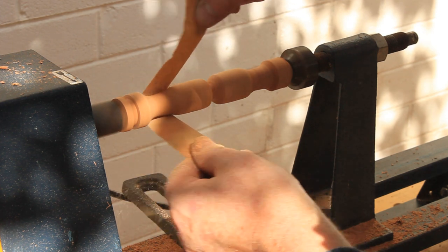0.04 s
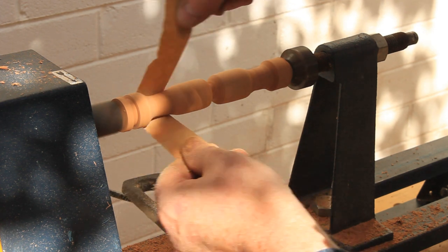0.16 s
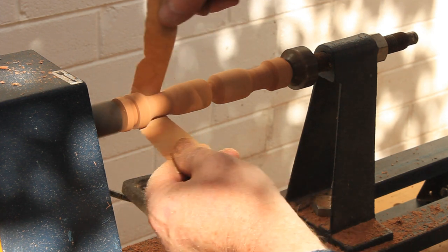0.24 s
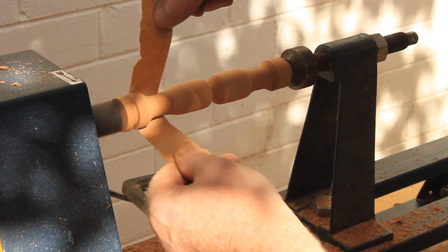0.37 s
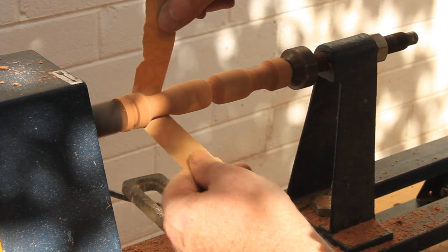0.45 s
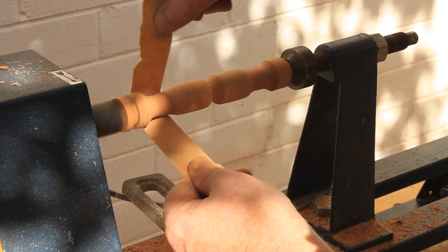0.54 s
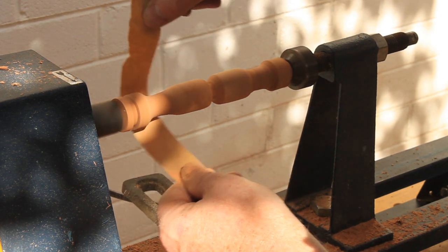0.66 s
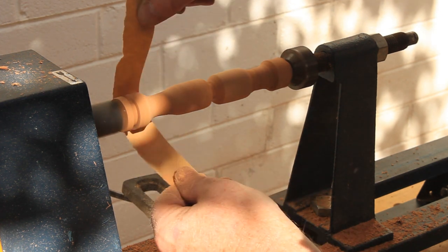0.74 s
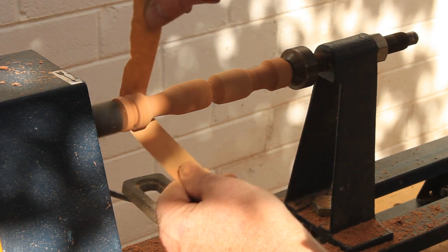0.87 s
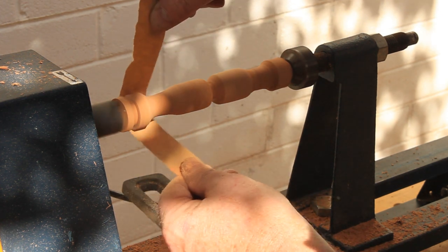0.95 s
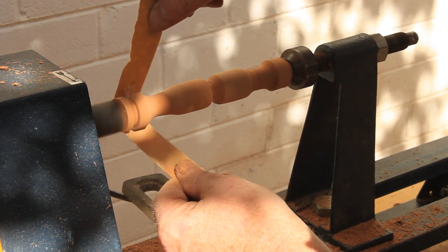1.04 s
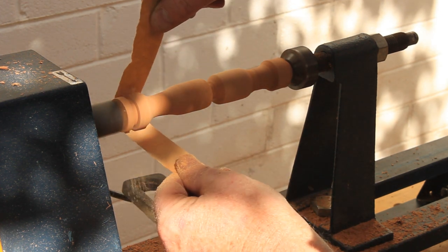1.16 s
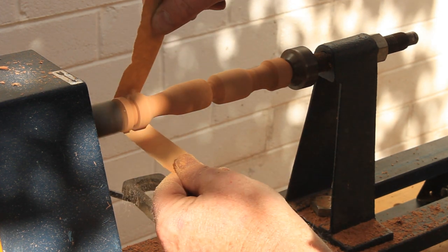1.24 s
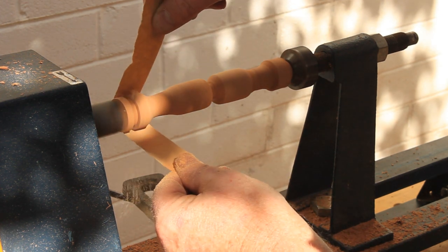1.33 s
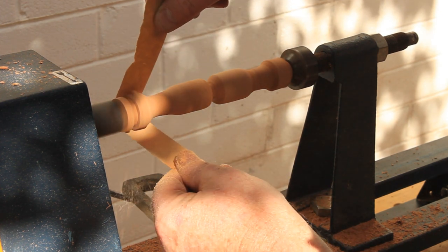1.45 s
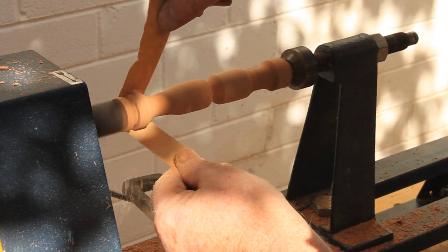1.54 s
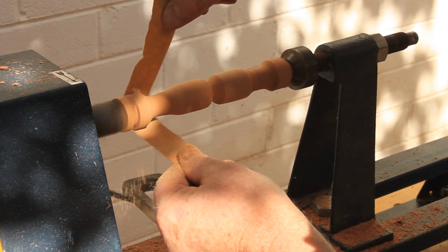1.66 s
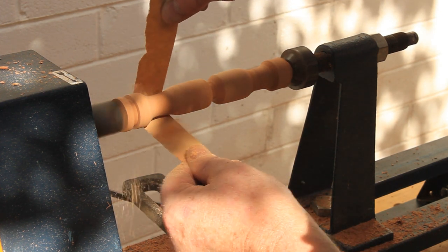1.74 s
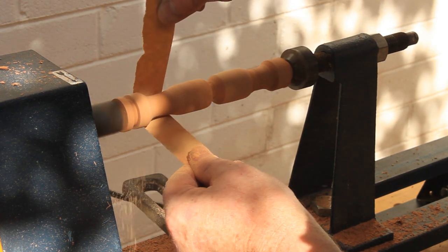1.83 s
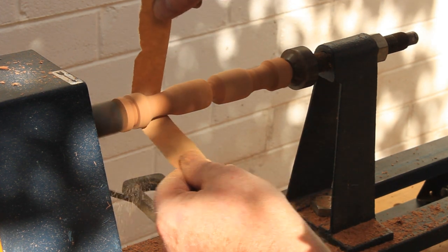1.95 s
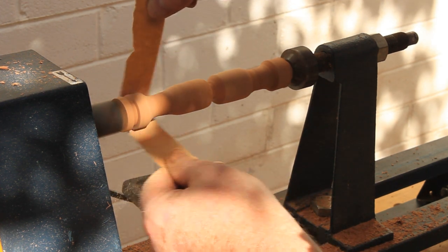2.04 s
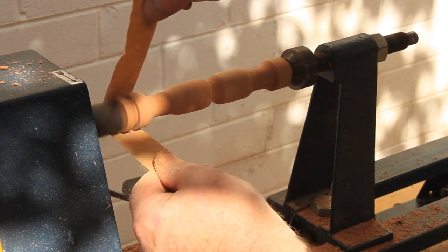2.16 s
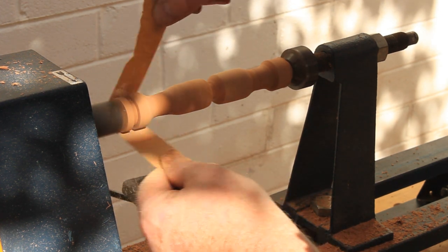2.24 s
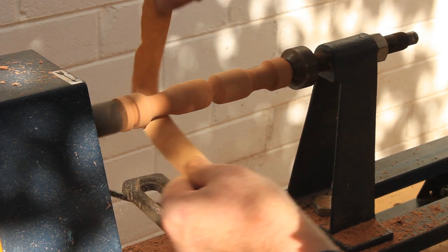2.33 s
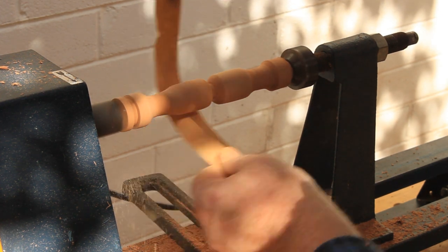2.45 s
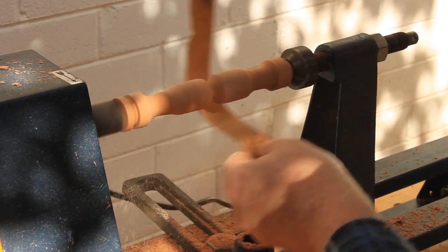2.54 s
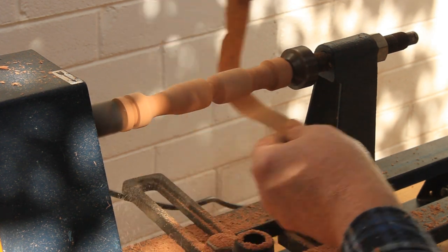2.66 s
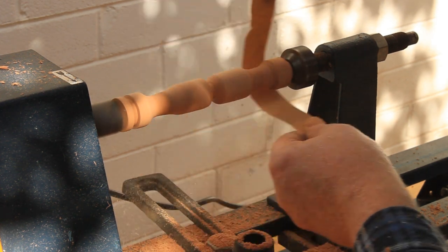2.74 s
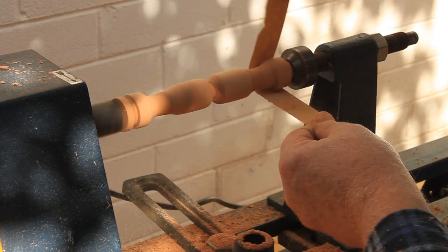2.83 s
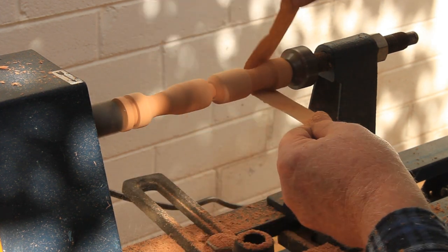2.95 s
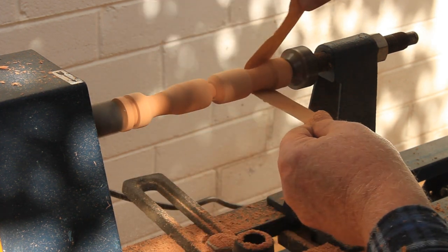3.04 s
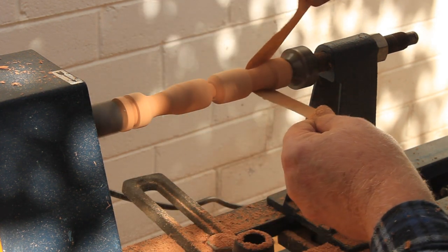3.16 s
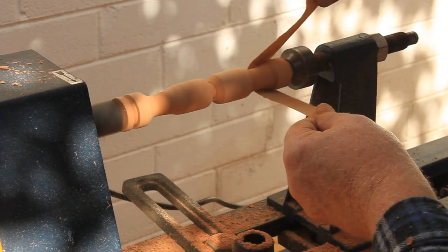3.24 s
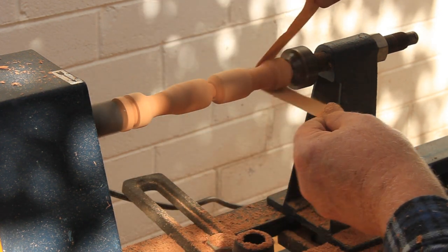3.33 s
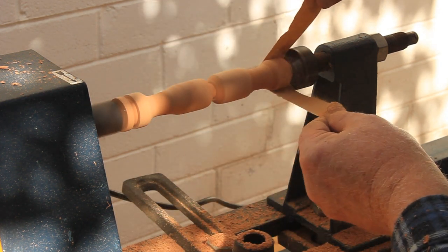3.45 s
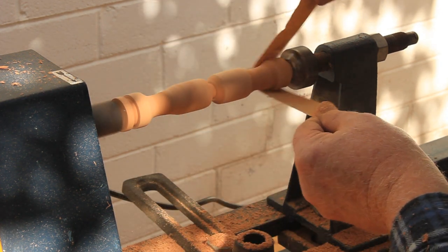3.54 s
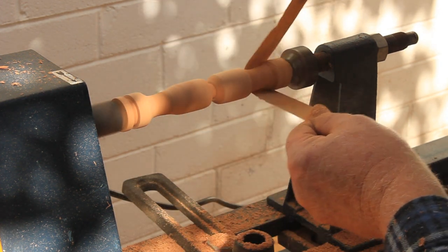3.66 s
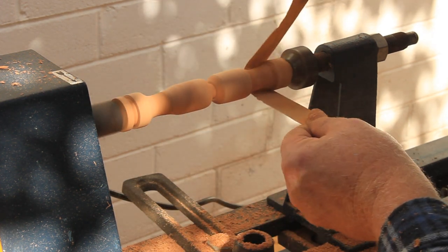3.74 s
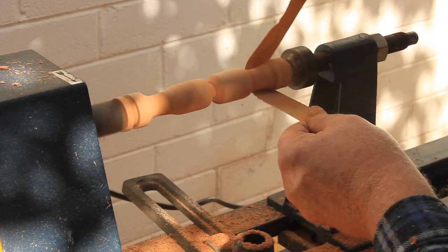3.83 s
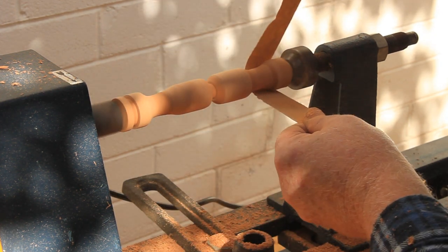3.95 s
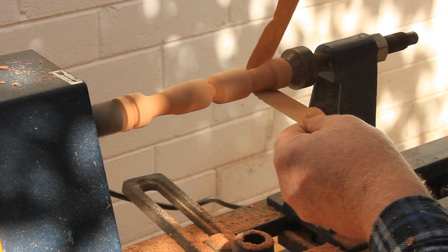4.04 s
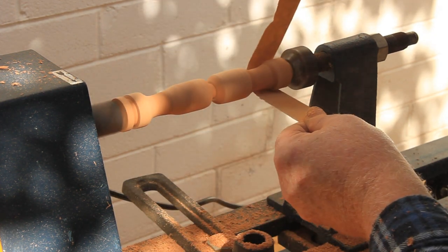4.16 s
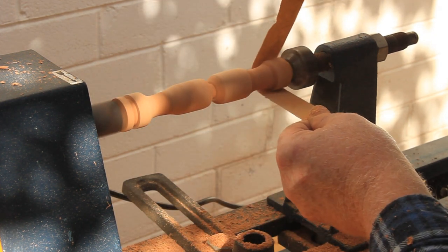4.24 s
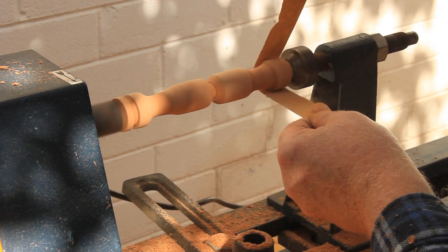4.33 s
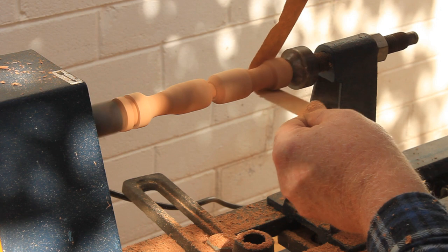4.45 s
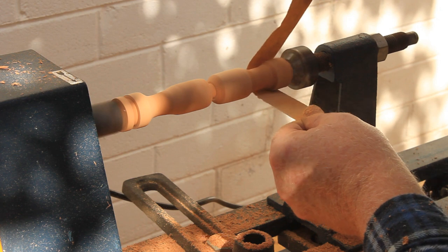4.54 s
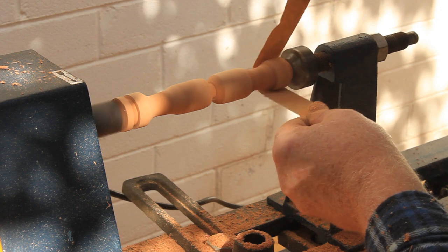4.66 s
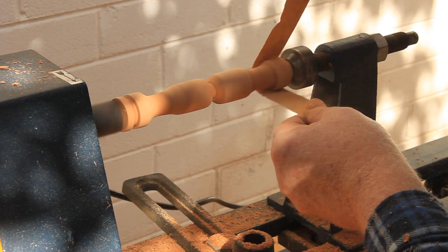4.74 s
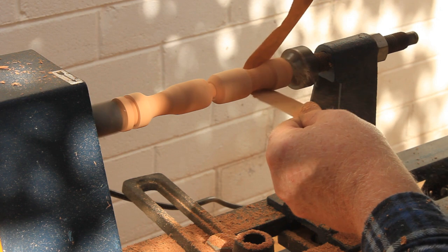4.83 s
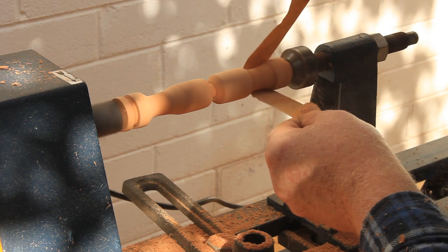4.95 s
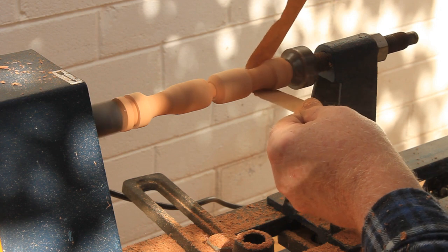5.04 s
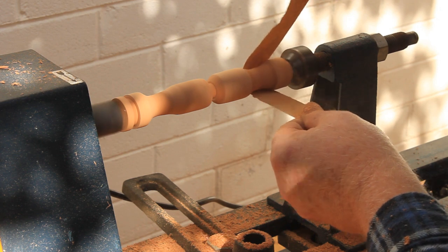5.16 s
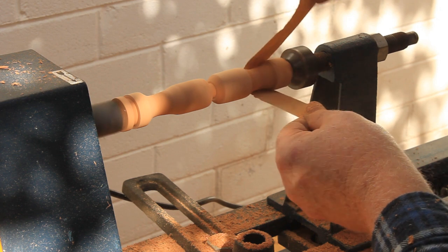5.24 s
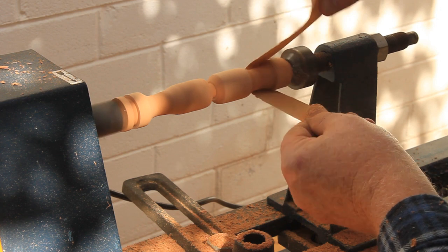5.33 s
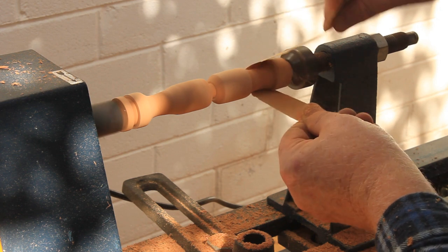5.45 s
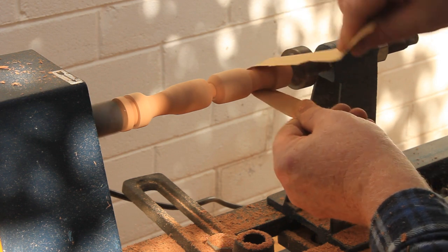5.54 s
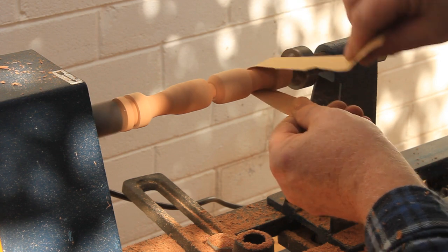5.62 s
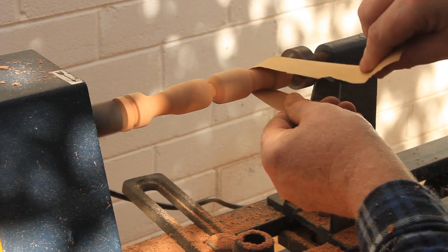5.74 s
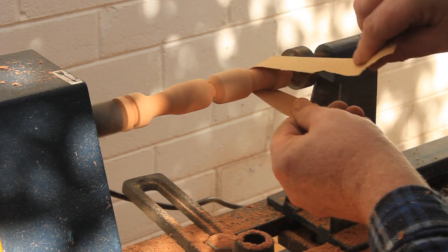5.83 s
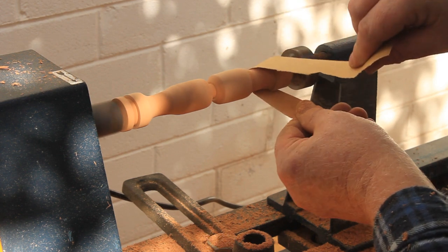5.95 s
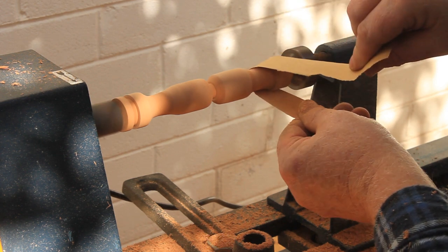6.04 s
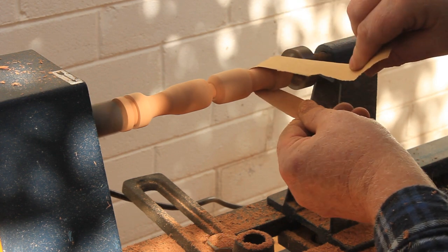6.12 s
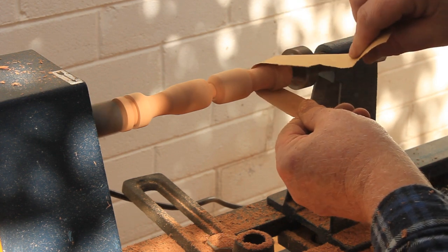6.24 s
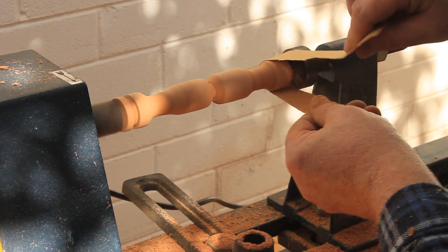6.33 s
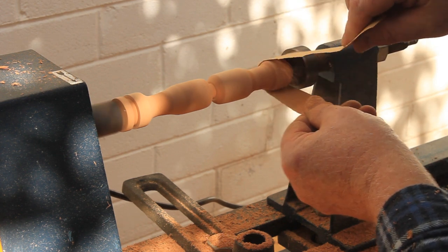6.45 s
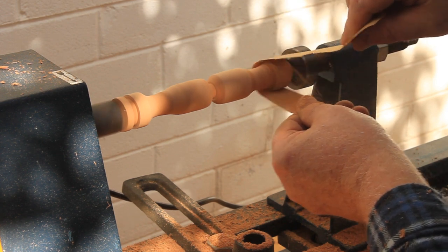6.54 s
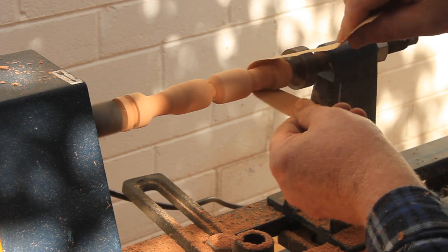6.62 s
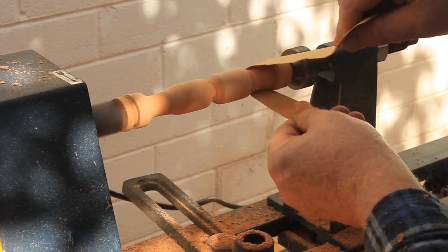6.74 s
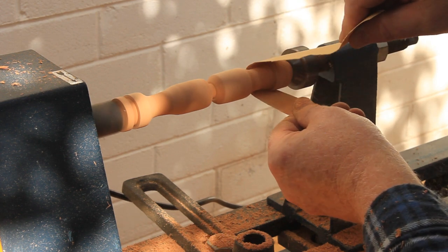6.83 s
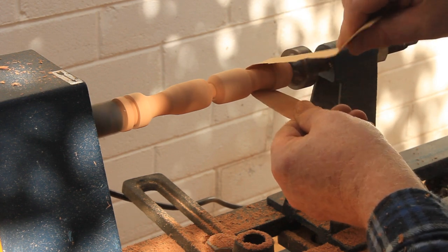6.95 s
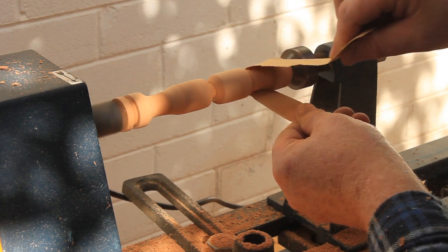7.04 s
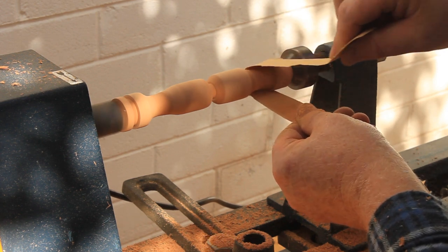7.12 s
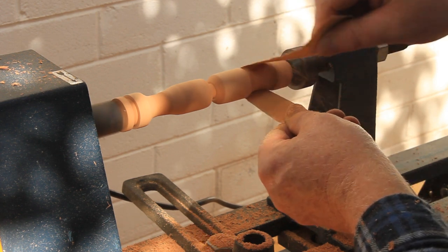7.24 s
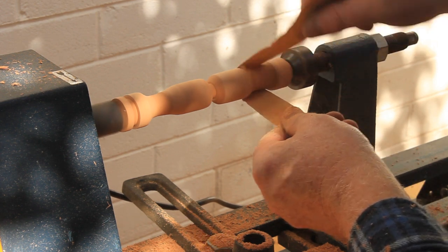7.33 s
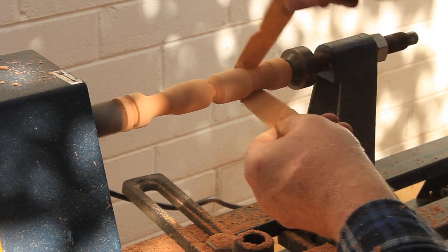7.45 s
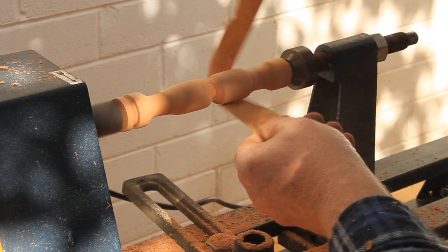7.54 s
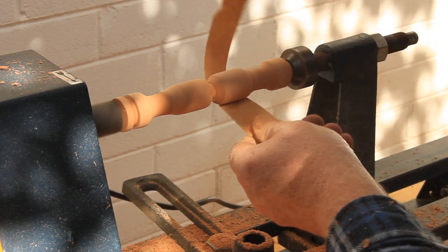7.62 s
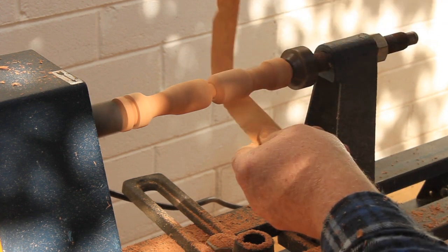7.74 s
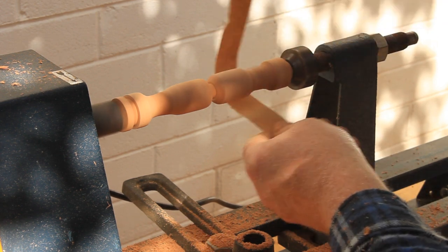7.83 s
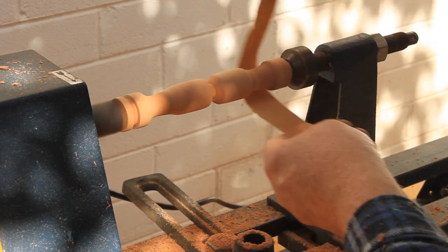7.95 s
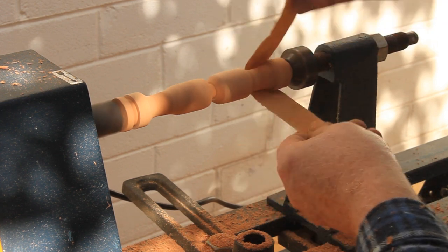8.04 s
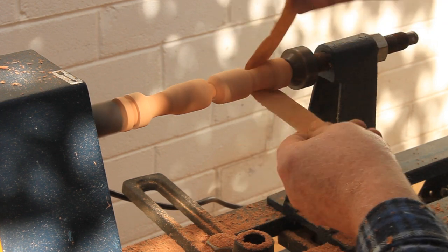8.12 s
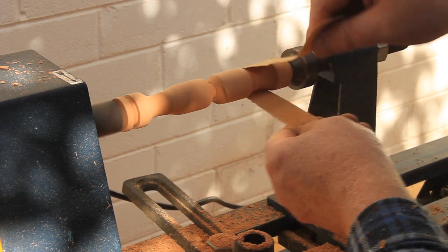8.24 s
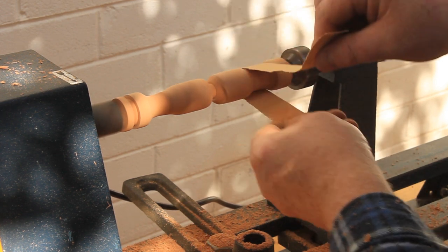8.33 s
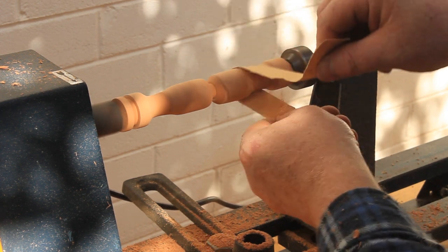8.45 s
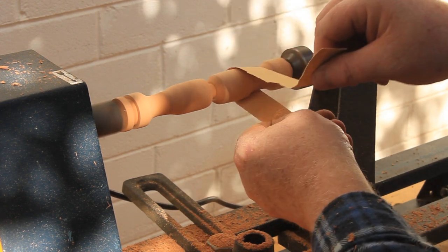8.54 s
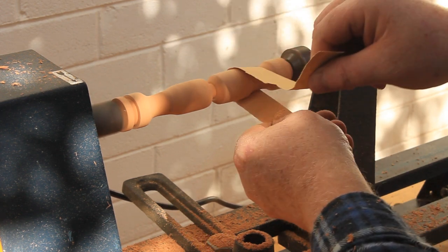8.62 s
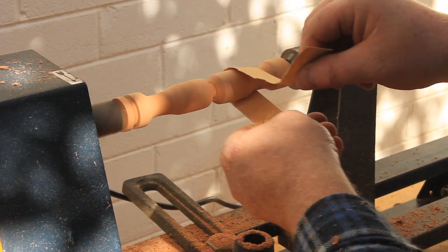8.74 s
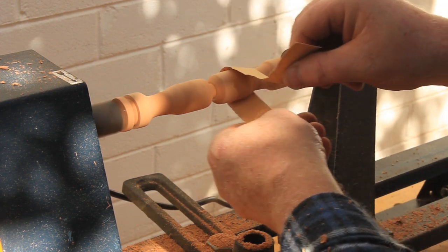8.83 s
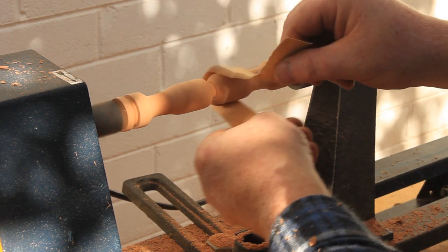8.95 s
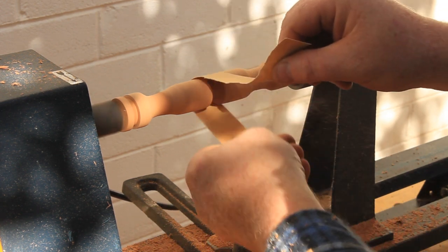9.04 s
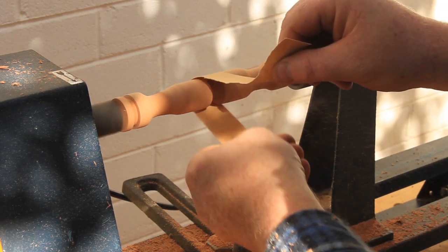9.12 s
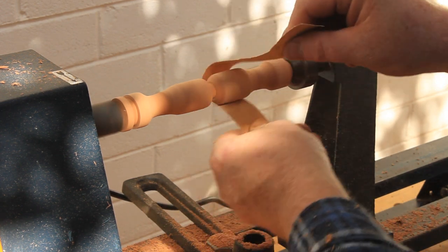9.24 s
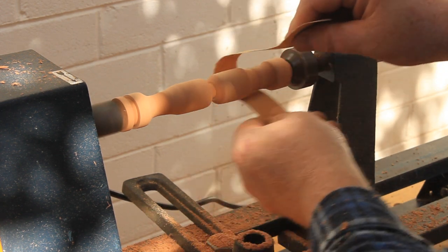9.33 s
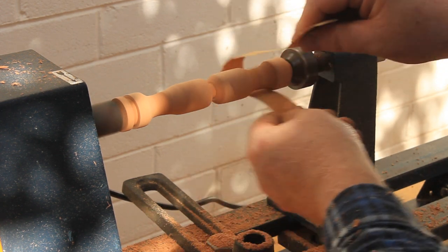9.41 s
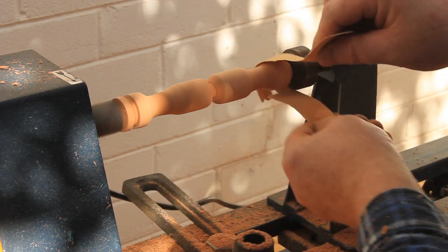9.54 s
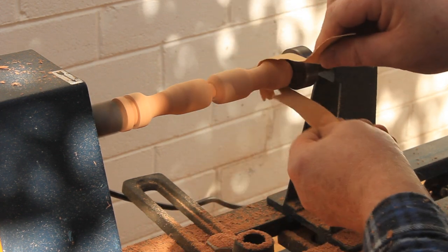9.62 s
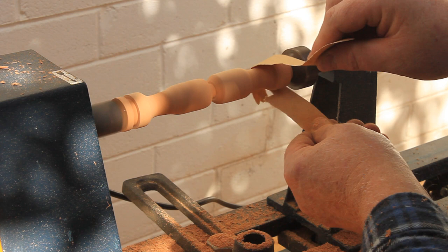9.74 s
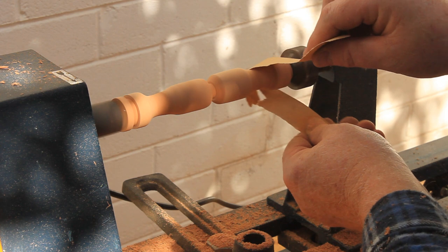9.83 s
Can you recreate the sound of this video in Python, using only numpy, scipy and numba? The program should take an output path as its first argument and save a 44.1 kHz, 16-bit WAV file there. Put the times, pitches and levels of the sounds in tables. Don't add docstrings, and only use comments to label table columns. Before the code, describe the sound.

A small lathe runs throughout: low electric hum, a belt drone, airy bearing whirr and faint wavering whines, its level dipping and recovering slightly. Over it, close and bright, sandpaper hisses on spinning wood, grainy and rapidly throbbing. At about 0.7 seconds the hiss drops out for an instant, then returns firmer, swelling and thinning. Near 2.4 it lifts again with a few papery ticks, leaving the machine exposed until about 2.85, when a long steady rub begins. From 5.7 thin squeaks flicker through the hiss, clustered around 6 to 6.6, with lower ones after 7.1. At 7.5 the strip lifts and flutters; a very faint deep rumble appears far off. Rubbing resumes at 8.0, with a piercing whistle near 8.4 and fading squeaks. It lifts at 9.2, leaving light touches, two crisp flicks around 9.55, and a short bright stroke that fades by 9.75.

```python
import sys
import numpy as np
from scipy import signal
from scipy.fft import rfft, irfft
from scipy.io import wavfile
from scipy.ndimage import uniform_filter1d
from numba import njit

SR = 44100
rng = np.random.default_rng(int(sys.argv[2]) if len(sys.argv) > 2 else 0)


def voltage_ratio(level):
    return 10 ** (np.asarray(level, float) / 20)


def dump(signal):
    limited = np.clip(np.atleast_2d(signal).T, -1, 1)
    pcm = np.round(limited * 32767).astype(np.int16)
    wavfile.write(sys.argv[1], SR, pcm)


N = 435708
TIME = np.arange(N) / SR
CLOCK = np.arange(0, N + 32, 32) / SR
SPINDLE_HZ = 29.52
HUM_HZ = 99.93 * np.arange(1, 7)


def rms_one(x):
    return x / np.sqrt(np.mean(x ** 2) + 1e-20)


def in_full(control):
    return np.interp(TIME, CLOCK, control)


def at_hz(points, hz):
    return np.interp(np.log(hz), np.log(np.array(points)[:, 0]), np.array(points)[:, 1])


def drift(rate):
    r = np.exp(-80 * np.pi * rate / SR)
    slow = signal.lfilter([1], [1, -2 * r, r * r], rng.standard_normal(N // 40 + 2002))[2000:]
    return np.interp(np.arange(N) / 40, np.arange(len(slow)), rms_one(slow))


def band(x, low_hz, high_hz):
    return signal.sosfilt(signal.butter(2, [low_hz, high_hz], "band", fs=SR, output="sos"), x)


def tones(hz, level_db, wobble, flicker_db=0):
    clock = TIME + wobble * drift(0.621)
    out = np.zeros(N)
    for f, db in zip(hz, level_db):
        if flicker_db:
            db = db + flicker_db * drift(6.0)
        out += np.sqrt(2) * voltage_ratio(db) * np.sin(2 * np.pi * (f * clock + rng.random()))
    return out


# [t/s, level/dB]
FAR_RUMBLE = [(0, -100), (7.3, -100), (7.8, -82), (8.3, -86), (8.5, -95), (9.4, -86), (9.88, -89)]


def far_rumble():
    s, level_db = np.transpose(FAR_RUMBLE)
    return voltage_ratio(np.interp(TIME, s, level_db)) * rms_one(band(rng.standard_normal(N), 35, 65))


# [f/Hz, level/dB per Hz]
WHIRR = [(30, -62), (77, -21.5), (144, -26), (305, 1.5), (444, -8), (540, -14.5), (660, -12.5), (880, -6.5),
         (1180, -12), (1950, -12.5), (2260, -15), (5000, -23.5), (12100, -42.5), (16000, -65)]


def whirr():
    hz = np.maximum(np.fft.rfftfreq(N, 1 / SR), 20)
    noise = irfft(rfft(rng.standard_normal(N)) * voltage_ratio(at_hz(WHIRR, hz)), N)
    return voltage_ratio(-57.5 + 0.5 * drift(15)) * rms_one(noise)


HUM_DB = [-74, -72.5, -64.5, -99, -83, -78.5]
SLOT_DB = [-77, -70.5, -77, -75, -97]
# [f/Hz, level/dB rms]
WHINES = [(884.9, -75), (1283, -78.5), (1404, -77.5), (1590, -78.5), (2062, -74.5), (2782, -76.5)]


def motor():
    hum = tones(HUM_HZ, HUM_DB, wobble=0.00025)
    slot_hz = 834.6 + HUM_HZ[0] * np.arange(-1, 4)
    slots = tones(slot_hz, SLOT_DB, wobble=0.0002, flicker_db=1.2)
    whines = tones(*np.transpose(WHINES), wobble=0.00204, flicker_db=4.5)
    return hum + slots + whines


# [f/Hz, level/dB]
CASING = [(60, -33), (120, -15), (200, -13.5), (270, -5), (320, 2.5), (400, -0.5), (470, -4), (600, 4),
          (900, -30)]


def belt():
    belt_hz = 8.43
    laps = np.delete(np.arange(-12, 17), 12)
    hz = (HUM_HZ[:4, None] + belt_hz * laps).ravel()
    lap_db = -3.0 * (laps % 2) + 6.6 * (laps == 2) - 0.21 * abs(laps)
    hum_db = np.array([[-2.5], [-3], [0.1], [-6]])
    level_db = (lap_db + hum_db).ravel() + at_hz(CASING, np.maximum(hz, 30))
    level_db = level_db + rng.normal(0, 2.8, len(hz))
    return voltage_ratio(-60.5) * rms_one(tones(hz, level_db, wobble=0.00066))


def spindle():
    hz = SPINDLE_HZ * np.arange(3, 17)
    return voltage_ratio(-69.5) * rms_one(tones(hz, at_hz(CASING, hz), wobble=0.00076))


# [t/s, time to duck/s, depth/dB]
DUCKS = [
    (1.0, 0.46, -6),
    (2.15, 0.13, -5.5),
    (3.4, 0.19, -3),
    (4.45, 0.38, -3),
    (5.45, 0.52, -6.5),
    (6.5, 0.6, -1.5),
    (8.37, 0.031, -7.5),
]


def auto_gain():
    full_gain_db, start_duck_db, recover_s = 5, -6, 1.13
    gain_db = full_gain_db + start_duck_db * np.exp(-CLOCK / recover_s)
    for s, onset, depth_db in DUCKS:
        recovery = np.exp(-np.maximum(CLOCK - s - onset, 0) / recover_s)
        gain_db = gain_db + depth_db * np.clip((CLOCK - s) / onset, 0, 1) * recovery
    return in_full(voltage_ratio(gain_db))


# [t/s, peak level/dB]
FLUTTER = [(2.4134, -46), (2.4957, -49), (2.5346, -60), (2.5726, -56), (7.5797, -51), (7.658, -45),
           (7.7694, -53), (7.7932, -44), (7.8226, -47), (7.9104, -46), (7.9518, -46), (9.2439, -44),
           (9.3033, -52), (9.3472, -53), (9.5397, -38), (9.5696, -33)]


def flutter():
    taps = np.full(N, 1e-18)
    for s, peak_db in FLUTTER:
        taps[round(s * SR)] += voltage_ratio(peak_db - 13.0)
    shape = signal.lfilter([1], [1, -np.exp(-1 / (0.008 * SR))], taps)
    return shape * rms_one(band(rng.standard_normal(N), 5600, 13000))


@njit
def moving_resonance(x, hz, width_hz, sr):
    y = np.zeros(len(x))
    for i in range(2, len(x)):
        r = np.exp(-np.pi * width_hz[i] / sr)
        ringing = 2 * r * np.cos(2 * np.pi * hz[i] / sr) * y[i - 1] - r * r * y[i - 2]
        y[i] = np.sqrt(1 - r) * x[i] + ringing
    return y


# [t/s, length/s, first f/Hz, last f/Hz, level/dB]
SQUEALS = [(5.696, 0.098, 4850, 5000, -44), (6.042, 0.066, 5600, 5700, -47),
           (6.118, .09, 4750, 4830, -45.5), (6.227, .085, 5130, 4150, -47.5),
           (6.308, .025, 4200, 4570, -44.5), (6.35, 0.15, 5900, 5900, -51.5),
           (6.473, 0.094, 5370, 5400, -51), (6.56, .02, 4600, 3900, -47), (6.573, 0.039, 3950, 4300, -47.5),
           (7.125, .04, 3750, 2850, -48.5), (7.17, 0.16, 2760, 2940, -50), (7.307, 0.13, 2950, 3150, -56),
           (8.208, 0.014, 3480, 3480, -44.5), (8.216, .04, 3420, 3440, -46), (8.264, .045, 3230, 3250, -45),
           (8.305, 0.069, 3400, 3570, -38), (8.38, 0.015, 3720, 3670, -28.5), (8.402, .02, 3600, 3650, -37),
           (8.421, .013, 3810, 3590, -31.5), (8.43, .035, 3650, 3520, -46), (8.54, 0.14, 3400, 3270, -53.5),
           (8.717, .08, 3270, 3270, -61), (8.865, 0.082, 3200, 3250, -56)]


def squeals():
    edge_db_per_s, loose_q, locked_width_hz = 2000, 16.6, 25
    hz = np.zeros(len(CLOCK))
    level_db = np.full(len(CLOCK), -np.inf)
    for s, length, first_hz, last_hz, db in SQUEALS:
        outside_s = np.maximum(abs(CLOCK - s - length / 2) - length / 2, 0)
        own_db = db - edge_db_per_s * outside_s
        glide_hz = np.interp(CLOCK, [s, s + length], [first_hz, last_hz])
        hz = np.where(own_db > level_db, glide_hz, hz)
        level_db = np.maximum(level_db, own_db)
    hz, level_db = in_full(uniform_filter1d(hz, size=16)), in_full(level_db)
    locked = np.interp(level_db, [-39, -30], [0, 1])
    width_hz = hz / loose_q * (1 - locked) + locked_width_hz * locked
    hz = hz + 0.2 * width_hz * drift(35)
    level_db = level_db + width_hz / 65 * drift(41)
    once = moving_resonance(rng.standard_normal(N), hz, width_hz * 1.5, SR)
    twice = moving_resonance(once, hz, width_hz * 1.5, SR)
    strength = np.sqrt(uniform_filter1d(twice ** 2, size=130) + 1e-12)
    return voltage_ratio(level_db) * twice / strength


# [landed t/s, landing time/s, lifts t/s, lifting time/s, level under the pull/dB]
CONTACTS = [(0, .01, .655, .068, 0), (.7, .02, .76, .02, -27), (.793, .022, 2.355, .052, 0),
            (2.415, .07, 2.425, .045, -7), (2.824, .014, 2.84, .01, -12), (2.848, .05, 7.5, .07, 0),
            (7.62, .06, 7.7, .035, -12), (7.72, .02, 7.97, .02, -32), (8.035, .07, 9.175, .125, 0),
            (9.245, .02, 9.285, .07, -14.5), (9.41, .2, 9.45, .06, -11), (9.54, .05, 9.56, .03, -8),
            (9.575, .03, 9.72, .07, 0), (9.735, .02, 9.75, .24, -10)]


def contact(clock):
    clear_db = -41
    touches = [np.interp(clock, [s - land, s, lift, lift + fall], [clear_db, db, db, clear_db])
               for s, land, lift, fall, db in CONTACTS]
    return np.max(touches, axis=0)


def throb():
    turn = 2 * np.pi * SPINDLE_HZ * TIME
    swing_db = 0.42 * (1 + 1.2 * drift(0.99)) * np.sin(turn + 1.2 * drift(0.7))
    swing_db = swing_db + 0.36 * drift(0.91) * np.sin(2 * turn)
    catches = (rng.random(N) < 45 / SR) * np.minimum(rng.exponential(1, N), 3)
    held = signal.lfilter([1], [1, -np.exp(-1 / (0.01 * SR))], catches)
    return voltage_ratio(swing_db + 1.37 * (held - held.mean()))


# [f/Hz, level/dB]
GRIT = [(1500, -11), (2200, -10), (2900, -4.5), (3450, 2), (4100, -1.5), (5200, 2.5), (6100, 1),
        (7500, 1.5), (12000, -0.5), (15000, 1.5), (16500, -20)]
# [t/s, pressure level/dB, strip resonance f/Hz, share rubbed by the edge/dB]
HEAD_STROKES = [
    [(0.0, -41, 8020, -5.5), (0.07, -44.5, 8300, -9), (0.232, -41, 7050, -7), (0.342, -35, 7400, -4),
     (0.562, -49, 7960, -8.5), (0.61, -40, 10000, -2), (0.65, -40, 9840, -2.5)],
    [(0.8, -36, 7160, -10), (0.856, -35.5, 8410, -3), (0.974, -36, 7200, -5), (1.16, -33.5, 9180, -3),
     (1.572, -37.5, 9250, 0), (1.664, -36.5, 8000, -4), (1.92, -51.5, 8560, -10.5)],
    [(1.92, -50, 8210, -8), (2.018, -37, 7960, -6), (2.07, -41, 8380, -6), (2.158, -32, 8610, -3.5),
     (2.29, -37, 8100, -1.5), (2.33, -42, 9210, 0), (2.36, -41.5, 8780, -4.5)],
]
TAIL_STROKES = [
    [(2.85, -36, 7960, -5), (3.21, -40, 6530, -6), (3.31, -39, 9050, -8), (3.81, -40, 8040, -5.5),
     (3.89, -41.5, 7100, -5.5), (4.23, -37.5, 9700, -5), (4.99, -37.5, 8190, -3), (5.04, -39.5, 7100, -2.5),
     (5.3, -39, 8410, -5)],
    [(5.3, -37, 7660, -6.5), (5.53, -36.5, 8550, -10), (5.87, -39, 7370, -10), (6.3, -40, 8620, -3.5),
     (6.35, -39, 7730, -5.5), (7.06, -40.5, 8650, -4), (7.29, -39.5, 6960, -8.5), (7.46, -40, 7300, -6.5),
     (7.5, -40.5, 8630, -3)],
]
LAST_STROKES = [
    [(8.03, -36.5, 9700, -3), (8.382, -38, 7340, -12.5), (8.496, -40, 9300, -4.5), (8.75, -37, 8150, -8),
     (9.038, -38.5, 10300, -4), (9.17, -47.5, 9840, -5.5)],
    [(9.575, -46.5, 11900, -5), (9.597, -45, 12100, 3), (9.613, -51, 11700, -1), (9.665, -38, 11200, -7.5),
     (9.709, -38.5, 11200, -8), (9.72, -44.5, 11200, -6)],
]
# [t/s, length/s, pressure change/dB, edge change/dB]
SWINGS = [(2.924, 0.13, -1.5, 1), (3.29, .14, -2.5, 2), (3.45, 0.31, 3, 4), (3.59, .1, -3.5, 4),
          (3.798, .08, 3.5, 0), (4.086, .3, 0.5, 0.5), (4.33, 0.14, 0.5, -1.5), (4.48, 0.15, 1, 3.5),
          (4.62, .25, 0.5, -1), (4.798, 0.11, 0.5, 3), (4.976, 0.1, 0.5, -3.5), (5.777, .06, 4, -3),
          (6.32, 0.018, 6.5, -2), (6.422, 0.29, 2, 3.5), (6.544, 0.075, -4, 3), (6.934, 0.053, 6, 0),
          (7.11, 0.15, 1.5, -2), (7.23, .16, -3.5, 0), (8.03, .04, -2.5, 1.5)]


def sanding():
    s, *controls = np.transpose(sum(HEAD_STROKES + TAIL_STROKES + LAST_STROKES, []))
    pull_db, strip_hz, edge_db = [np.interp(CLOCK, s, c) for c in controls]
    for at, length, db, more_db in SWINGS:
        swing = np.cos(np.pi * np.clip((CLOCK - at) / length, -0.5, 0.5)) ** 2
        pull_db, edge_db = pull_db + db * swing, edge_db + more_db * swing
    touch_db = contact(CLOCK)
    more_edge_db = edge_db + 0.07 * touch_db + 5.5

    edges = np.geomspace(1500, 16500, num=29)
    hz = np.sqrt(edges[1:] * edges[:-1])[:, None]
    strip_ring_db = 3.5 * np.exp(-(np.log2(hz / strip_hz) / 0.41) ** 2)
    edge_ring_db = (2 + 0.5 * more_edge_db) * np.exp(-(np.log2(hz / 12640) / 0.25) ** 2)
    tilt_db = 0.43 * more_edge_db * np.log2(np.maximum(hz, 3000) / 9000)
    colour_db = at_hz(GRIT, hz) + strip_ring_db + edge_ring_db + tilt_db

    lows = 1 / (1 + (hz / 4620) ** 6)
    lows_db, lows_follow, usual_pull_db = -4.5, 0.39, -37.5
    whole_db = 10 * np.log10(np.sum((1 - lows) * hz * voltage_ratio(colour_db) ** 2, axis=0))
    wood_db = lows * (lows_db - (1 - lows_follow) * (pull_db - usual_pull_db))
    level_db = colour_db - whole_db + pull_db + wood_db + touch_db

    scratches = rng.standard_normal((2, N)) * voltage_ratio(1.96 * rng.exponential(1, (2, N)))
    scratches = rms_one(scratches) * throb()
    out = np.zeros(N)
    for k, (low, high) in enumerate(zip(edges, edges[1:])):
        patch_db = 1.17 * drift(2.26) + 1.75 * drift(13.5)
        out += band(scratches[k % 2], low, high) * voltage_ratio(in_full(level_db[k]) + patch_db + 53.0)
    return out


GRIPS_S = [0, .45, .75, 1.35, 1.9, 2.6, 3.35, 3.9, 4.4, 5, 5.5, 6, 6.55, 7.1, 7.8, 8.5, 9.3]
# [delay t/s, level/dB]
NEAR_ECHOES = [
    (.00115, -24),
    (.0028, -9),
]


def surroundings(x):
    lag, out = np.arange(1500), x.copy()
    ends = GRIPS_S[1:] + [11]
    for k, (start, end) in enumerate(zip(GRIPS_S, ends)):
        echoes = rng.standard_normal(len(lag)) * voltage_ratio(-28.5 - 60 * lag / SR / 0.041) * (lag > 25)
        for s, level_db in NEAR_ECHOES:
            delay = round(s * SR * rng.uniform(0.95, 1.05))
            echoes[delay] += voltage_ratio(level_db) * rng.choice([-1, 1])
        echoes = signal.lfilter([0.7], [1, -0.3], echoes)
        fades_s = [start - 0.1, start + 0.1, end - 0.1, end + 0.1]
        share = np.interp(TIME, fades_s, [k == 0, 1, 1, 0])
        a, b = np.flatnonzero(share)[[0, -1]]
        heard = signal.oaconvolve((x * share)[a:b], echoes)[:N - a]
        out[a:a + len(heard)] += heard
    return out


def scene():
    machine = whirr() + motor() + belt() + spindle()
    strip = surroundings(sanding() + flutter()) + squeals()
    mono = far_rumble() + auto_gain() * machine + strip
    return np.array([mono, mono])


# [t/s, level/dB]
SPLITS = [ (.291, -50), (1.313, -45), (1.452, -58), (2.265, -54), (3.449, -50), (3.519, -47), (3.774, -49),
          (4.494, -48), (4.587, -47), (5.028, -57), (5.818, -60), (6.886, -57), (9.022, -56)]


def side_puffs():
    window = np.zeros(N)
    for s, level_db in SPLITS:
        middle = round(s * SR)
        window[middle - 1024:middle + 1024] = voltage_ratio(level_db + 2) * np.hanning(2048)
    highs = signal.ellip(8, 0.5, 50, [4300, 13500], "band", fs=SR, output="sos")
    puffs = window * rms_one(signal.sosfilt(highs, rng.standard_normal(N)))
    return puffs * [[1], [-1]]


def roll_off(x):
    return signal.sosfilt(signal.butter(12, 16770, fs=SR, output="sos"), x)


def record(dry):
    cut = signal.ellip(14, 0.3, 75, 15760, fs=SR, output="sos")
    mix = signal.sosfilt(cut, dry + side_puffs())
    return roll_off(mix)


dry = scene()
out = record(dry)
dump(out)
```